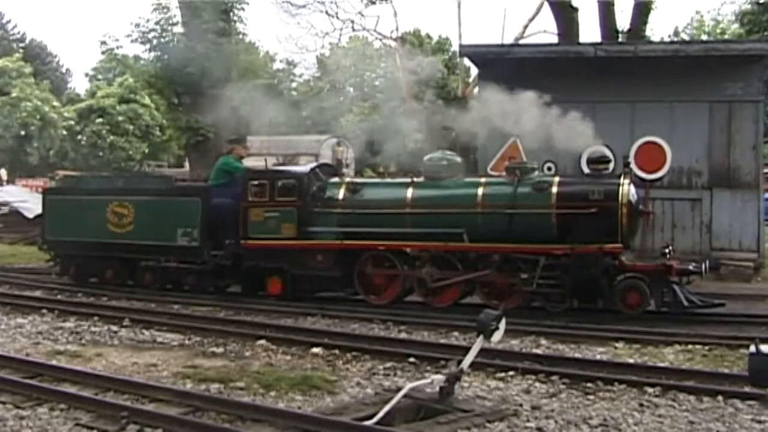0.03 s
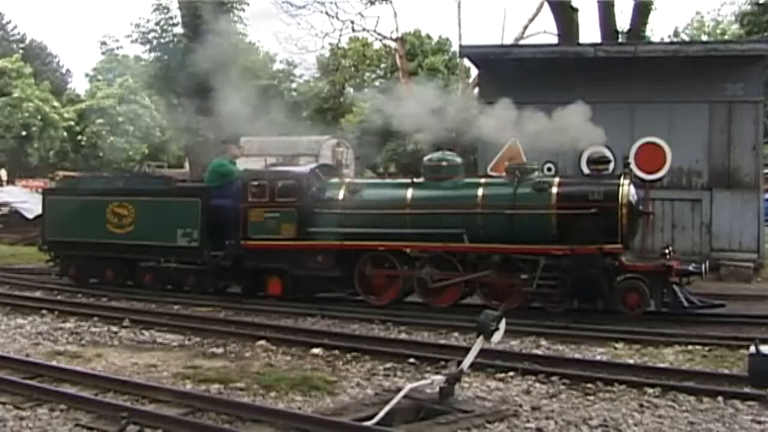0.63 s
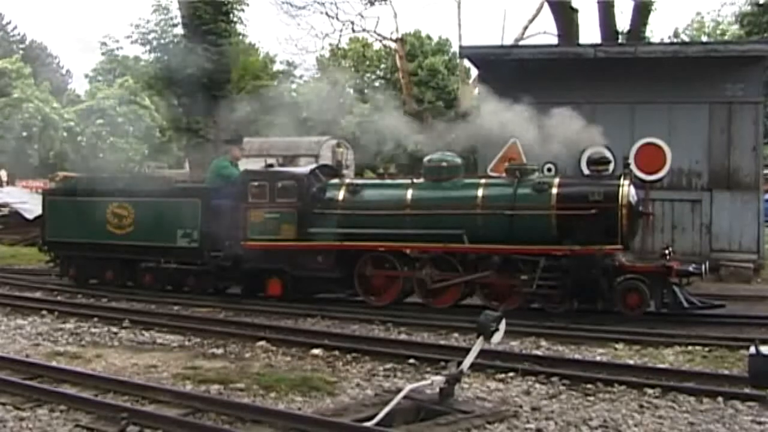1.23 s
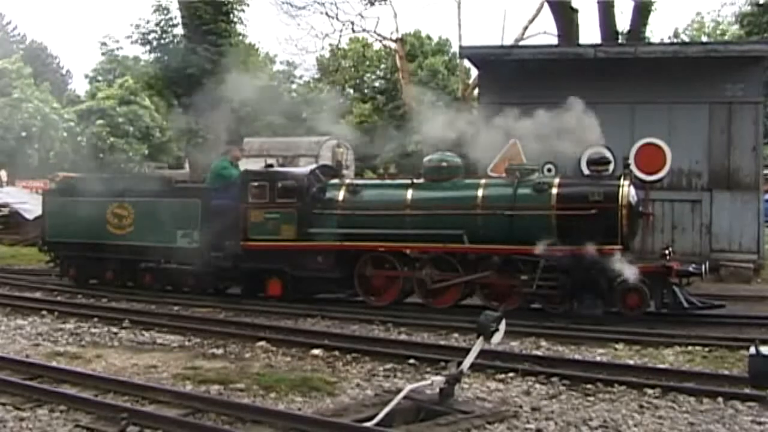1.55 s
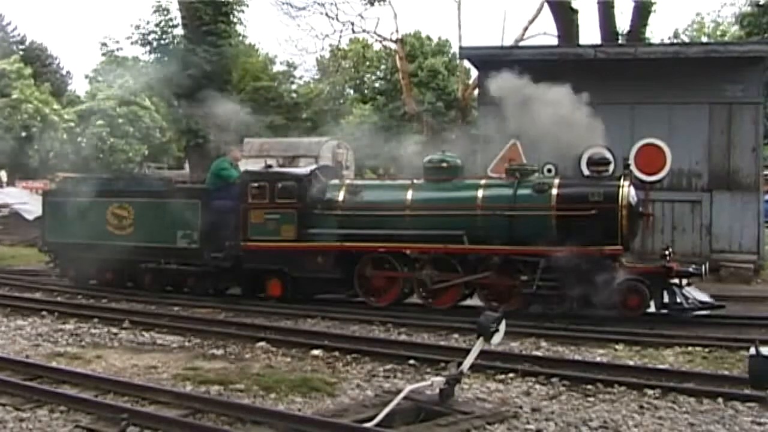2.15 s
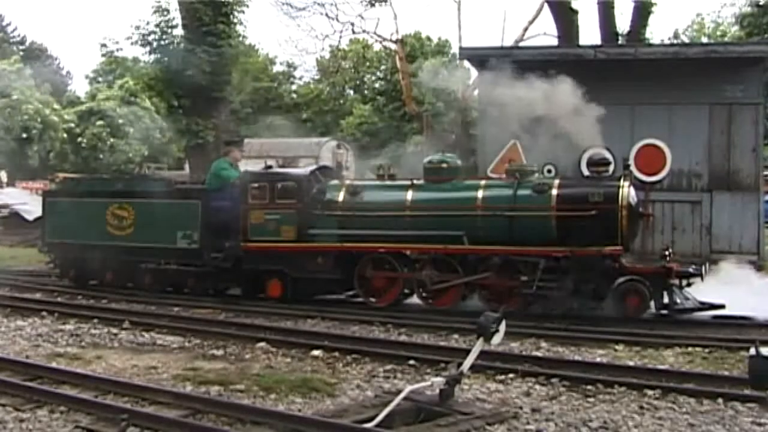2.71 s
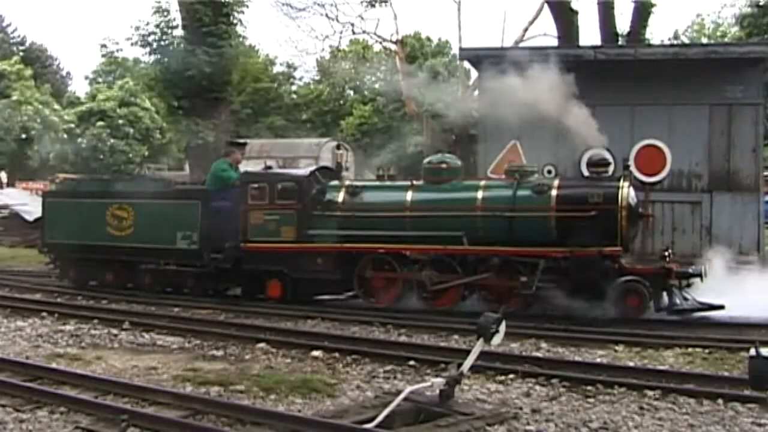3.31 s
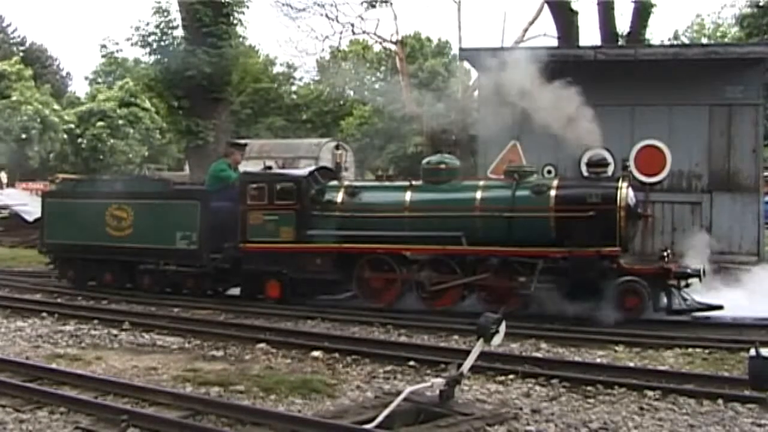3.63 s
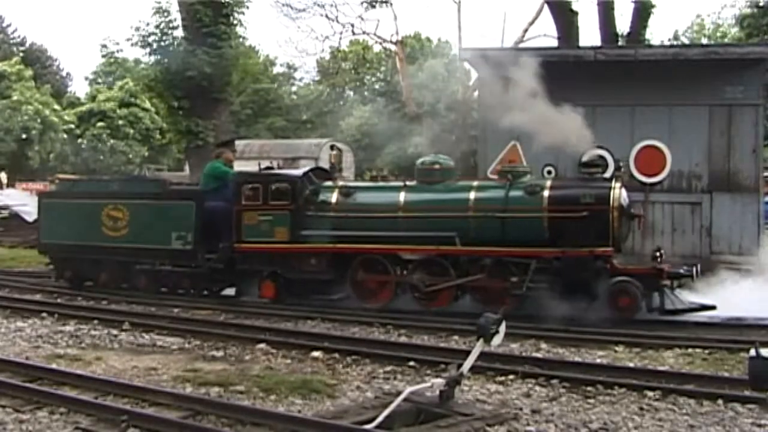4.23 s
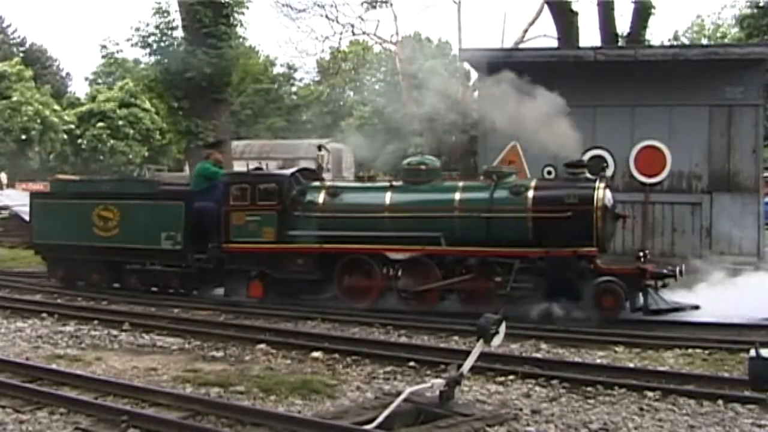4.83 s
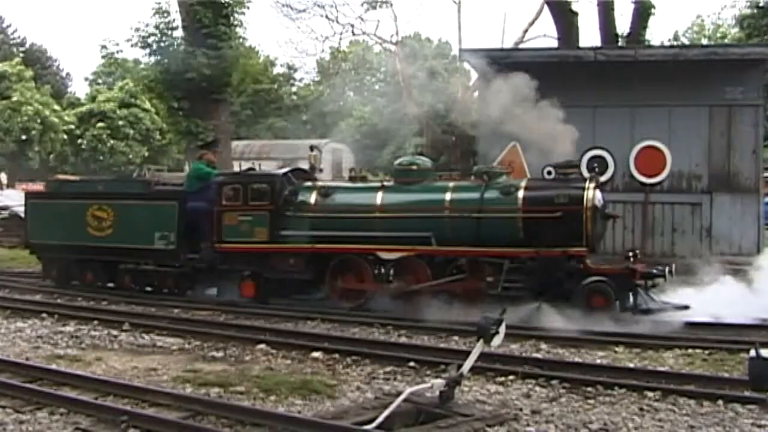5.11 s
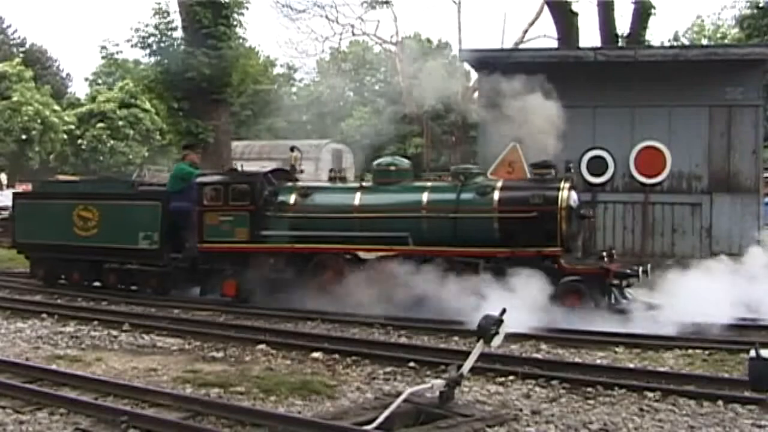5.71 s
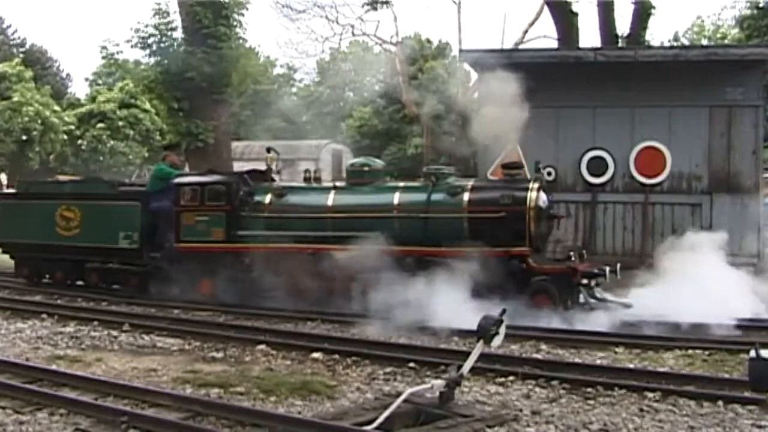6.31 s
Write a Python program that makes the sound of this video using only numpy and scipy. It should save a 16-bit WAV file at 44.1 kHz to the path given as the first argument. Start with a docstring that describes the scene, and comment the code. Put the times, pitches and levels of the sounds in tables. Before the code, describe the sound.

At the start, a short, breathy steam whistle dies away, echoing faintly around a yard for under a second. Underneath, a small steam locomotive keeps up a soft chimney draught and a low fire rumble, with two faint dull thumps. At about 1.2 and 1.4 seconds its drain cocks give two wet, hollow coughs, followed by a crisp spit of droplets and a few small thuds. From about 1.8 seconds a steam hiss builds steadily, stepping up near 3.2 seconds. It is loudest from 4 to 4.7 seconds, bright and sizzling over a lower roar. Around 5 seconds it drops and changes tone as a second jet takes over, with a brief splutter at 5.2. The first jet returns near 6.2 seconds, and the hiss continues, slowly easing, until the end at about 6.7. Everything is heard from beside the track, mostly on the right.

```python
"""The drain cocks of a miniature steam locomotive, heard in a yard from beside the track.
They open with a wet cough, then blow a loud hiss that swells as the engine creeps off; when the pistons
change stroke a second cock takes over. Before that, a short whistle dies away among the sheds.
The chimney blower and the fire run underneath. The engine is mostly on the right of the stereo
microphone, which overloads on the loudest hiss."""
import sys
import numpy as np
from scipy import signal
from scipy.fft import rfft, irfft
from scipy.io import wavfile
from scipy.ndimage import map_coordinates

SR = 44100
rng = np.random.default_rng(int(sys.argv[2]) if len(sys.argv) > 2 else 0)


def log_audio(samples):
    """Write samples as a 16-bit WAV file to the path given in sys.argv[1]."""
    # one column per channel
    frames = np.atleast_2d(samples).T
    # limit to full scale, then quantise
    limited = np.clip(frames, -1, 1)
    pcm = np.round(limited * 32767).astype(np.int16)
    wavfile.write(sys.argv[1], SR, pcm)


N = 288855
T = np.arange(N) / SR
HZ = np.maximum(np.fft.rfftfreq(N, 1 / SR), 1)
SAG_S = 5.61  # the steam sags from here as the pistons move on

# Where jets and engine sit at the microphone. Each row: frequency in Hz, left minus right in dB.
JET_BALANCE = [(60, -29), (110, -14), (200, -16), (380, -15), (700, -14), (1290, -14.5), (2380, -16),
               (4400, -19.5), (8120, -29.5), (15000, -29)]
ENGINE_BALANCE = [(60, -8), (110, -18), (200, -7.5), (380, -8), (700, -8), (1290, -9.5), (2380, -13),
                  (4400, -15), (8120, -11.5), (15000, -8)]
# First puffs through the flooded drain pipe. Each row: start and hold in seconds, wet cough in dB,
# lift of its hollow body in dB, force of the clear jet in dB.
DRAIN_PUFFS = [(1.218, 0.13, -29.5, -3, -45), (1.37, 0.021, -31.5, -12, -32)]


def drain_cocks(pressure, flutter_db=0.5, spit_db=-0.06):
    """Two cocks blow, the first ahead along the track, the second in the open; wet steam spits."""
    # Each row: time in seconds, share of the steam leaving by the second cock from 0 to 1.
    stroke = [(4.89, 0), (4.95, 0.35), (5.12, 0.64), (5.25, 0.84), (5.9, 0.9), (6.25, 0.07), (6.55, 0.33)]
    # Surges as the engine rolls. Each row: time in seconds, lifts of hiss, sizzle and roar in dB.
    surges = [(3.2, -0.5, -1, 0), (3.4, 0.2, -1.5, 1.5), (3.93, 1, -1, .8), (4.46, 1.5, -0.2, 2.5),
              (4.57, 1.5, 1.5, 3), (4.82, 0, 1.5, 2.5), (5.11, 1.3, 0, 0), (5.26, 1.1, -1.2, 0.5),
              (5.37, 1, -4, .5), (5.52, 1.5, 0, -4), (5.62, -1, -2.5, -2), (5.73, -1, -0.5, -3),
              (5.87, -1.5, -0.5, -3), (5.98, 1.5, 2, -4), (6.06, -1, 1.7, -5.5), (6.16, -1.3, 4, -2),
              (6.33, -1.5, -0.5, 4.5), (6.45, 1, 3, 2)]
    second_share = np.clip(curve(stroke), 0, 1)
    spit = undb(spit_db * (4.0 - pressure) * wander(220))
    hiss_db, sizzle_db, roar_db = sum(np.outer(dbs, swell(s, length_s=0.036)) for s, *dbs in surges)
    jet = hiss(pressure, second_share) * undb(hiss_db + flutter_db * wander(62))
    jet += track_echoes(sizzle(pressure)) * undb(sizzle_db + flutter_db * wander(75))
    return jet * spit + plume(pressure, second_share) * undb(roar_db)


def hiss(pressure, second_share, gain_db=-19, growth=0.65, second_db=2.5, return_db=1):
    """Each cock colours its own hiss; a slow, wet jet has more middle and a thin edge."""
    # Each row: frequency in Hz, spectral level in dB.
    colour = [(800, -44), (1300, -6.5), (1700, -6), (2500, -1.5), (3900, 1.5), (5400, 3.5), (6800, 1.5),
              (7800, 0), (9500, -9), (15000, -45)]
    # Resonances of the jets. Each row: centre in Hz, width in Hz, lift in dB.
    first_cock = [(1240, 140, -12), (1370, 120, 5.5), (1685, 59, 9.5), (1787, 82, 3.5), (1910, 67, 0),
                  (1982, 64, 6), (2220, 150, 4.5), (2350, 90, -1), (2560, 81, 6), (2810, 83, 3),
                  (2935, 66, -1.5), (3020, 71, 2.5), (3700, 55, 6), (3900, 89, -3.5), (4670, 200, 2),
                  (5430, 290, 2.5), (5840, 140, -2), (6300, 740, 3.5), (6950, 230, -3)]
    wet_steam = [(2000, 3700, 7), (1590, 110, 2.5), (6100, 120, 3), (6430, 170, 5)]
    first_cock_farther = [(1570, 250, 1), (2170, 300, 6.5), (2800, 250, 2), (4620, 300, -3),
                          (5200, 500, 4.5), (5800, 220, 2.5), (6370, 500, 1.5)]  # blowing again, farther down the track
    second_cock = [(1800, 95, 9.5), (2013, 70, 6.5), (2206, 72, 11.5), (2770, 260, 7), (3500, 330, 4),
                   (4290, 150, 6.5), (5150, 390, 3), (5840, 310, -1.5), (6460, 200, 3.5), (7300, 780, -12)]
    slow, fast, farther, second = (
        turbulence(undb(across(colour)) * resonances(modes), JET_BALANCE, band_hz=(2000, 7000))
        for modes in (first_cock + wet_steam, first_cock, first_cock_farther, second_cock))
    opening = blend(fast, slow, np.exp(-pressure / 0.19))
    first = track_echoes(blend(opening, farther * undb(return_db), ramp(start_s=5.6, length_s=0.34)))
    second = sway(second, depth=.007, rate_hz=3.1) * undb(second_db)
    both = blend(first, second, second_share)
    sputtering = eddies(both, band_hz=(1400, 6000), sputter_db=1.5, rate_hz=15, count=20)
    return sputtering * pressure ** growth * undb(gain_db)


def sizzle(pressure, gain_db=-11.5, growth=1.004, choke_db=3):
    """The fast core of the jet; at full pressure it chokes and gathers in a high hump."""
    # Each row: frequency in Hz, spectral level in dB.
    colour = [(4000, -22), (7000, -5), (8700, -4.5), (10400, 0), (11500, 1), (13300, -3), (14500, 0),
              (15800, -8.5)]
    # Nozzle resonances. Each row: centre in Hz, width in Hz, lift in dB.
    nozzle = [(8690, 230, 6.5), (9500, 550, 3.5), (10340, 400, -1.5), (12750, 540, 2.5)]
    free, choked = (
        turbulence(undb(across(colour)) * resonances(modes), JET_BALANCE, band_hz=(8500, 15000))
        for modes in (nozzle, nozzle + [(12700, 2700, choke_db)]))
    core = blend(free, choked, np.minimum(pressure, 1))
    return sway(core, depth=.012, rate_hz=4) * pressure ** growth * undb(gain_db)


def plume(pressure, second_share, gain_db=-27.0, knee=0.69, wheels_db=1.5, rolling_db=-1, billow_db=1.0):
    """Spreading steam roars under the frame, shifts as the engine rolls, and fades between the wheels."""
    # Each row: frequency in Hz, spectral level in dB.
    colour = [(40, -19), (100, -7), (200, -9), (350, -3.5), (520, -2), (700, -2.5), (1000, -3.5),
              (1200, -2), (1450, -4.5), (2000, -12.5), (4000, -45)]
    # Resonances of the frame and the plume's places. Each row: centre in Hz, width in Hz, lift in dB.
    underframe = [(207, 42, 7.5), (330, 13.4, 8.5), (398, 65, 4), (646, 150, 4.5), (835, 34, -3.5),
                  (920, 170, 4.5), (1256, 31, -8.5), (1410, 110, 0.5)]
    at_rest = [(370, 57, 2.5), (630, 70, 2), (820, 66, -1.5), (920, 74, -0.5), (1150, 72, -3.5),
               (1400, 210, 4)]
    on_the_move = [(930, 76, 1.5), (1560, 300, -7)]
    between_wheels = [(360, 82, 6), (716, 110, -6), (1450, 170, 2)]
    band_hz = (300, 1300)
    resting, rolling, hollow = (
        turbulence(undb(across(colour)) * resonances(underframe + modes), JET_BALANCE, band_hz)
        for modes in (at_rest, on_the_move, between_wheels))
    ahead = blend(resting, rolling * undb(rolling_db), ramp(start_s=3.81, length_s=0.37))
    roar = blend(ahead, hollow * undb(wheels_db), second_share)
    roar = sway(roar, depth=.015, rate_hz=5)
    roar = eddies(roar, band_hz, sputter_db=1.97, rate_hz=10, count=8)
    size = pressure / np.hypot(pressure, knee)  # levels off at high pressure
    return roar * size * undb(gain_db + billow_db * wander(24)) * fade(SAG_S, db_per_s=4)


def steam_pressure(full_db=-12.5):
    """Pressure at the cocks, near 1 when full: two puffs, a long build-up, then a sag."""
    # Each row: time in seconds, force of the steam in dB, where full_db is full pressure.
    force = [(1.7, -40), (1.85, -33), (2.03, -31), (2.13, -27), (2.64, -23), (2.72, -24), (2.87, -20.5),
             (3.14, -19.5), (3.18, -17), (4.02, -13), (4.65, -13), (4.885, -16), (4.925, -18.5), (5.0, -21),
             (5.39, -23)]
    water_cleared = ramp(start_s=1.54, length_s=0.21)
    steady = undb(curve(force)) * fade(SAG_S, db_per_s=4.5) * water_cleared
    puff_power = sum((undb(db) * puff(s, hold, fade_db_per_s=30)) ** 2
                     for s, hold, _, _, db in DRAIN_PUFFS)
    return np.sqrt(steady ** 2 + puff_power) / undb(full_db)


def eddies(sound, band_hz, sputter_db, rate_hz, count):
    """Eddies in the wet steam make each narrow band of a range sputter on its own."""
    low, high = np.log(band_hz)
    band_index = (np.log(HZ) - low) / (high - low) * (count - 1)
    spectrum, out = rfft(sound), sound.copy()
    for k in range(count):
        narrow = irfft(spectrum * np.maximum(1 - abs(band_index - k), 0), N)
        gain = undb(sputter_db * wander(rate_hz))
        out += narrow * (gain / np.sqrt(np.mean(gain ** 2)) - 1)
    return out


def sway(sound, depth, rate_hz):
    """The resonances of a jet drift a little as its steam turns wetter or drier."""
    position = np.cumsum(1 + depth * wander(rate_hz))
    return np.array([map_coordinates(channel, [position], mode="mirror") for channel in sound])


def track_echoes(sound, shimmer_s=3e-5):
    """Short reflections hollow the jet; their paths drift with the engine and waver in the hot air."""
    # Off ballast, rails and frame. Each row: delay in seconds, drift in seconds per second, gain in dB.
    paths = [(.0023, -6e-5, -24.5), (.0037, 9e-5, -19), (.0062, -1.1e-4, -14), (0.0126, 1.3e-4, -10.5)]
    out = sound.copy()
    for delay, drift, db in paths:
        sent_at = T - delay - drift * T - shimmer_s * wander(4)
        out += undb(db) * np.array([np.interp(sent_at, T, channel) for channel in sound])
    return out


def port_pinch(level_db=-23.0):
    """Just before the stroke changes, the closing steam port gives the hiss a brief bright edge."""
    edge = turbulence(bell(5650, width_hz=800), JET_BALANCE)
    return edge * undb(level_db) * swell(centre_s=4.84, length_s=0.026)


def cough(body_hz=480, body_width_hz=350):
    """Wet steam rings the drain pipe: hollow on the first puff, brighter as the pipe starts to empty."""
    # Each row: frequency in Hz, spectral level in dB.
    colour = [(60, -19), (130, -5), (220, -14), (335, 4), (500, -5), (700, -7.5), (1180, -12), (1400, -15),
              (2500, -12), (4000, -15), (4800, -24), (7500, -21), (11500, -13), (15500, -30)]
    # Each row: centre in Hz, width in Hz, lift in dB.
    pipe_modes = [(520, 57, 14.5), (1310, 43, 10), (1457, 55, 17.5), (1630, 75, 7), (1830, 75, 13.5),
                  (2000, 70, 5), (2470, 100, 12), (2700, 180, 5), (3190, 130, 5), (3870, 140, 8),
                  (4200, 170, 12)]
    pipe = undb(across(colour)) * resonances(pipe_modes)
    out = np.zeros((2, N))
    for start, hold, db, body_db, _ in DRAIN_PUFFS:
        body = resonances([(body_hz, body_width_hz, body_db)])
        out += turbulence(pipe * body, JET_BALANCE) * undb(db) * puff(start, hold, fade_db_per_s=86)
    return out


def spray(level_db=-35.0, drops_per_s=900, spread_db=4.5):
    """The last puff tears the water in the pipe into a crisp spit of droplets."""
    # Each row: frequency in Hz, spectral level in dB.
    colour = [(500, -25), (2000, -8), (4500, -6), (6300, 2), (10000, 0), (13000, -3), (15800, -10)]
    start, hold = DRAIN_PUFFS[-1][:2]
    drops = (rng.random(N) < drops_per_s / SR) * rng.choice([-1, 1], N)
    sizes = undb(spread_db * rng.standard_normal(N))
    spectrum = rfft(drops * sizes) * undb(across(colour))
    pair = irfft(np.array([spectrum * undb(across(JET_BALANCE)), spectrum]), N)
    return pair / pair.mean(0).std() * undb(level_db) * puff(start, hold, fade_db_per_s=120)


def water_slugs():
    """Each slug of condensate leaves with a short splutter or thud."""
    # Each row: time in seconds, level in dB, length in seconds, centre in Hz, width in Hz.
    slugs = [(1.423, -35.5, 0.025, 1850, 500), (1.445, -36, 0.023, 90, 70), (1.478, -28, 0.031, 199, 175),
             (1.481, -30, 0.0024, 260, 420), (1.528, -32, 0.0043, 250, 200), (1.58, -36, 0.014, 75, 50),
             (1.673, -33, 0.0098, 61.4, 50), (5.22, -27.5, 0.02, 2400, 910)]
    return sum(turbulence(bell(hz, width), ENGINE_BALANCE) * undb(db) * swell(s, length)
               for s, db, length, hz, width in slugs)


def whistle(gain_db=-39, lip_db=-0.5, lip_fade_db_per_s=42, yard_fade_db_per_s=16):
    """A breathy stopped pipe, odd partials strongest; the top dies first, and the yard echoes faintly."""
    # Each row: centre in Hz, width in Hz, relative level in dB, fade in dB per second, far echo in dB.
    partials = [(827, 48, 0, 27, -7), (1630, 110, -5, 54, -2.5), (2530, 155, 6, 70, -15),
                (3420, 120, -3, 80, -24), (4220, 120, 5.5, 86, -19), (5090, 75, -1, 72, -17),
                (5900, 150, -6, 90, -24)]
    # Steam round the lip. Each row: frequency in Hz, spectral level in dB.
    lip_colour = [(300, -15), (900, -10), (1500, -18), (1950, -15), (2500, -2), (3000, -10), (3700, -5),
                  (4600, -6), (5500, -8), (7500, -13), (15000, -33)]
    # Slaps back off the sheds. Each row: time in seconds, lift in dB, length in seconds.
    shed_slaps = [(.15, 1.5, 0.013), (0.33, 5, 0.03), (.515, 5.5, 0.044), (.65, 3.5, .03)]
    breath = turbulence(undb(across(lip_colour)), ENGINE_BALANCE) * undb(lip_db - lip_fade_db_per_s * T)
    tones = whistle_core()
    for hz, width, db, fade_db_per_s, echo_db in partials:
        near = undb(-fade_db_per_s * T)
        far = undb(echo_db - yard_fade_db_per_s * T)
        tones += turbulence(bell(hz, width), ENGINE_BALANCE) * undb(db) * np.hypot(near, far)
    slaps = undb(sum(db * swell(s, length) for s, db, length in shed_slaps))
    return (breath + tones * slaps) * undb(gain_db)


def whistle_core(start_hz=856, sag_hz=30, sag_s=0.07, lift_db=5.5, fade_db_per_s=40, left_db=-8):
    """The focused core of the whistle's fundamental sags and wavers a little as the valve closes."""
    waver = 1 + .007 * wander(40)
    hz = (start_hz - sag_hz * (1 - np.exp(-T / sag_s))) * waver
    tone = np.sqrt(2) * np.sin(2 * np.pi * np.cumsum(hz) / SR)
    return tone * undb(lift_db - fade_db_per_s * T) * undb([[left_db], [0]])


def thumps():
    """Dull thumps from the standing engine."""
    # Each row: time in seconds, level in dB.
    beats = [(.31, -38), (.49, -39)]
    envelope = sum(undb(db) * swell(s, length_s=0.02) for s, db in beats)
    return turbulence(bell(100, width_hz=26), ENGINE_BALANCE) * envelope


def blower(pressure, idle_db=-38.0, slack_db=-4.5, waver_db=0.65):
    """The steady draught up the chimney, slacker while the cylinders take steam."""
    # Each row: frequency in Hz, spectral level in dB.
    colour = [(60, -37), (130, -10), (200, -3.5), (330, -4), (570, -7.5), (830, -7.5), (950, -10.5),
              (1950, -14.5), (3100, -15.5), (4500, -19.5), (5200, -16.5), (7100, -23), (12000, -22.5),
              (15500, -29)]
    # Each row: centre in Hz, width in Hz, lift in dB.
    chimney_modes = [(105, 30, 0), (168, 42, -7), (210, 28, 4), (334, 44, 5.5), (1017, 40, 7),
                     (1380, 130, 2), (1530, 180, 1), (1870, 230, -2), (2360, 200, 2)]
    draught = turbulence(undb(across(colour)) * resonances(chimney_modes), ENGINE_BALANCE)
    return draught * undb(idle_db + flare_db() + slack_db * pressure + waver_db * wander(23))


def fire(pressure, idle_db=-44.5, slack_db=-3.0, flicker_db=2.2):
    """The fire rumbles unevenly in its draught."""
    # Each row: frequency in Hz, spectral level in dB.
    colour = [(15, -12), (25, 0.5), (40, -6), (60, 3), (85, -1.5), (105, -1), (135, -1), (180, -13),
              (400, -48)]
    rumble = turbulence(undb(across(colour)), ENGINE_BALANCE)
    return rumble * undb(idle_db + flare_db() + slack_db * pressure + flicker_db * wander(11))


def flare_db():
    """The draught picks up and the fire flares."""
    # Each row: time in seconds, lift in dB, length in seconds.
    flares = [(0.4, 1, 0.14), (3.1, 3.5, 0.18)]
    return sum(db * swell(s, length) for s, db, length in flares)


def turbulence(colour, balance, band_hz=(1, SR / 2), left_lead_s=4.5e-5):
    """Coloured flow noise at the stereo microphone; the mean of both sides has rms 1 inside the band."""
    # Each row: frequency in Hz, likeness of left and right from 0 to 1.
    coherence = [(100, 0.56), (300, 0.67), (700, 0.97), (1400, 0.76), (3000, 0.55), (7000, 0)]
    right, unrelated = rfft(rng.standard_normal((2, N)))
    likeness = np.clip(across(coherence), 0, 1)
    left = likeness * right * np.exp(2j * np.pi * HZ * left_lead_s)
    left += np.sqrt(1 - likeness ** 2) * unrelated
    pair = colour * np.array([left * undb(across(balance)), right])
    inside = (HZ >= band_hz[0]) & (HZ <= band_hz[1])
    return irfft(pair, N) / irfft(pair.mean(0) * inside, N).std()


def resonances(modes):
    """Gain of a set of peaks and dips in a broad noise."""
    return undb(sum(db * bell(hz, width) for hz, width, db in modes))


def bell(centre_hz, width_hz):
    """Response of one resonance with steep skirts, 1 at its centre."""
    skirt = 1 + ((HZ - centre_hz) / (.75 * width_hz)) ** 2
    return 1 / (skirt * np.sqrt(skirt))


def wander(rate_hz):
    """Smooth random motion of spread 1, mostly slower than the rate."""
    count = N // 32
    rolloff = 1 + (HZ[:count // 2 + 1] / rate_hz) ** 4
    slow = irfft(rfft(rng.standard_normal(count)) / rolloff, count)
    return np.interp(T, np.linspace(0, T[-1], count), slow / slow.std())


def puff(start_s, hold_s, fade_db_per_s, attack_s=0.04):
    """Attack, hold and release of one puff."""
    return ramp(start_s, attack_s) * fade(start_s + attack_s + hold_s, fade_db_per_s)


def ramp(start_s, length_s):
    """Rises evenly from 0 to 1."""
    return np.clip((T - start_s) / length_s, 0, 1)


def fade(start_s, db_per_s):
    """Holds at 1, then dies away."""
    return undb(-db_per_s * np.maximum(T - start_s, 0))


def swell(centre_s, length_s):
    """A Gaussian rise and fall, 1 at its centre; the length is its standard deviation."""
    return np.exp(-.5 * ((T - centre_s) / length_s) ** 2)


def blend(first, second, share):
    """Cross-fade of two unrelated noises at constant power."""
    return np.sqrt(1 - share) * first + np.sqrt(share) * second


def curve(points):
    """Points joined by straight lines in time."""
    seconds, value = np.transpose(points)
    return np.interp(T, seconds, value)


def across(points):
    """Points joined by straight lines on a log-frequency axis."""
    hz, value = np.transpose(points)
    return np.interp(np.log(HZ), np.log(hz), value)


def undb(db):
    """Decibels to gain."""
    return 10 ** (np.asarray(db) / 20)


def scene():
    """The engine from the trackside; one steam pressure drives the cocks and slackens blower and fire."""
    pressure = steam_pressure()
    return (whistle() + cough() + spray() + water_slugs() + drain_cocks(pressure) + port_pinch()
            + blower(pressure) + fire(pressure) + thumps())


def record(dry, ceiling=0.94, top_hz=15800):
    """The microphone overloads on the loudest hiss, and the highest treble is cut."""
    lowpass = signal.ellip(10, .1, 70, top_hz, fs=SR, output="sos")
    return signal.sosfilt(lowpass, np.clip(dry, -ceiling, ceiling))


dry = scene()
out = record(dry)
log_audio(out)
```